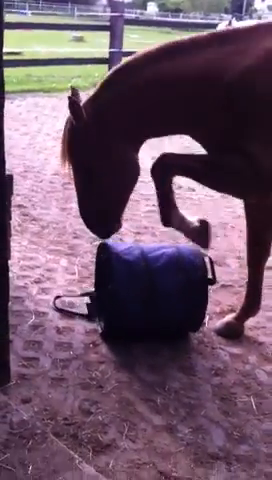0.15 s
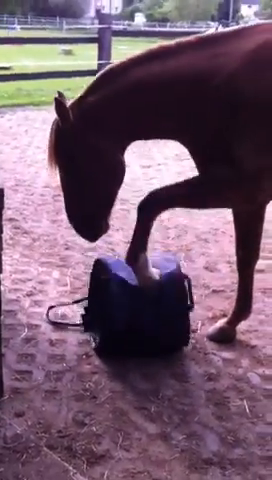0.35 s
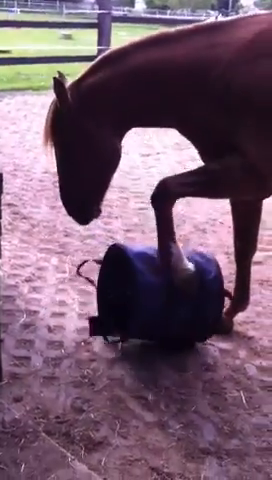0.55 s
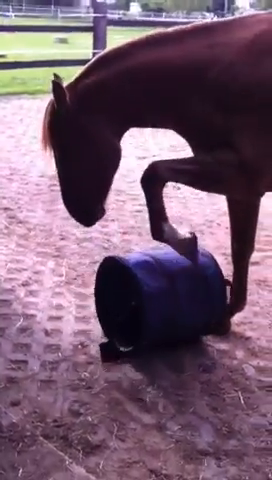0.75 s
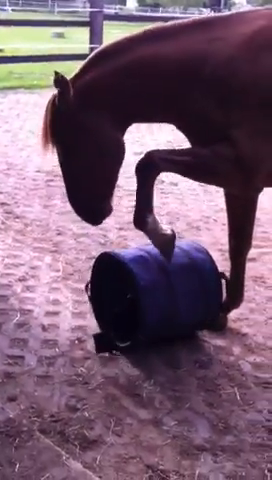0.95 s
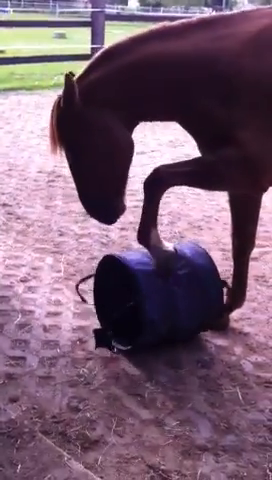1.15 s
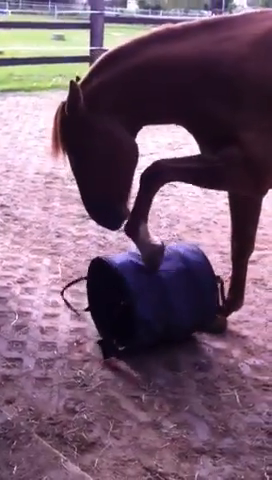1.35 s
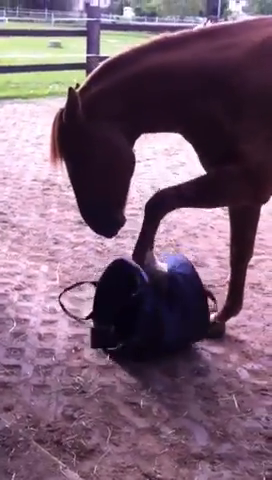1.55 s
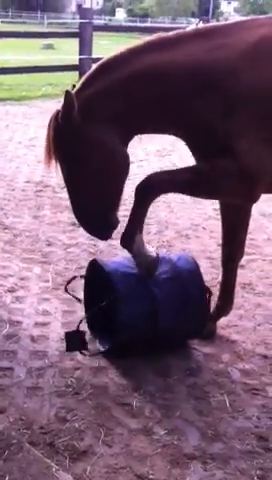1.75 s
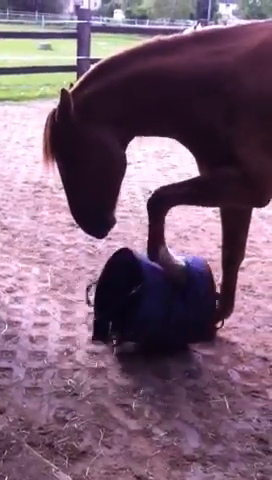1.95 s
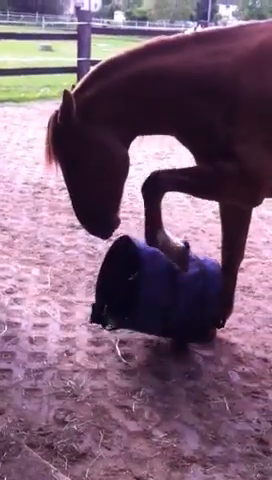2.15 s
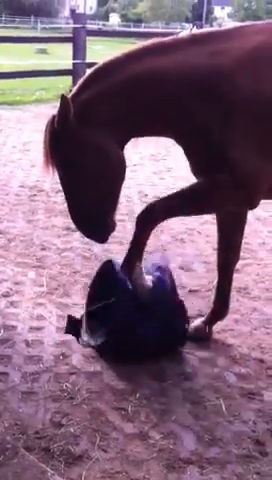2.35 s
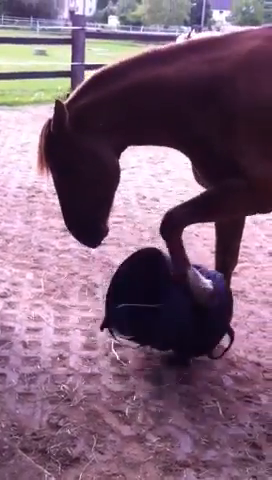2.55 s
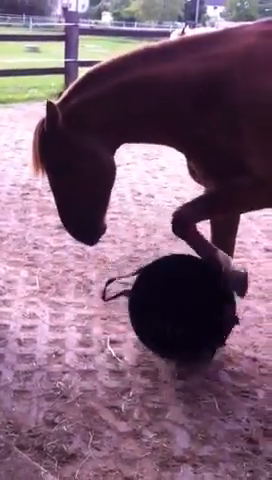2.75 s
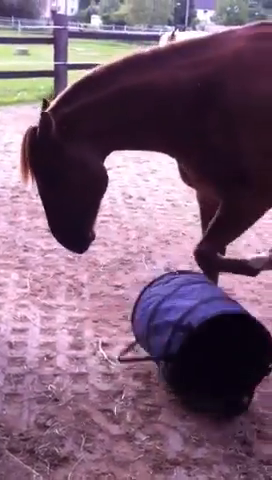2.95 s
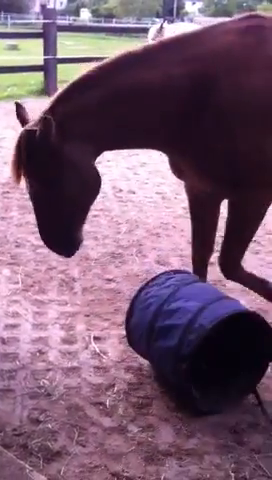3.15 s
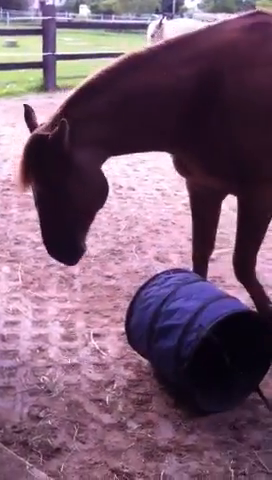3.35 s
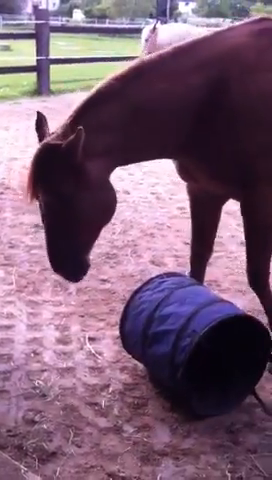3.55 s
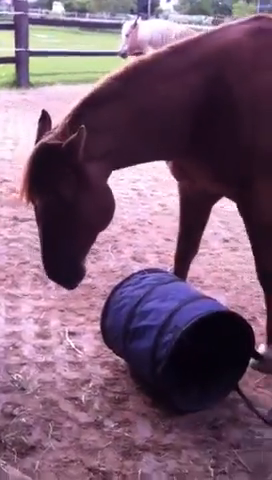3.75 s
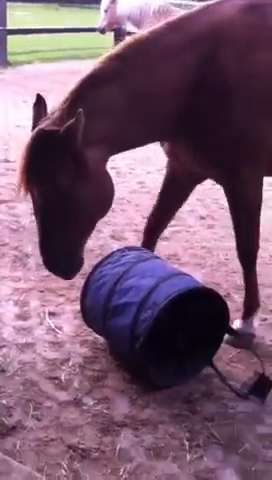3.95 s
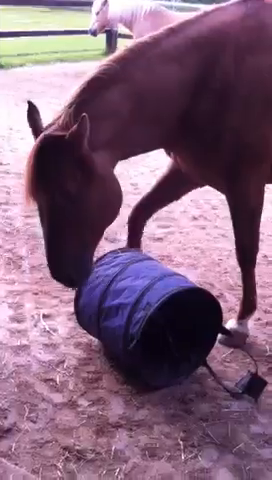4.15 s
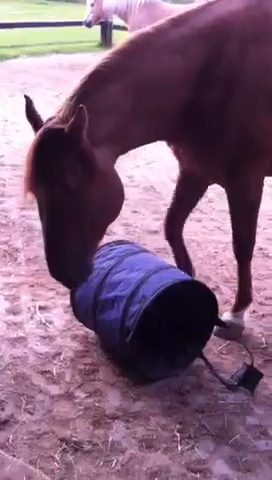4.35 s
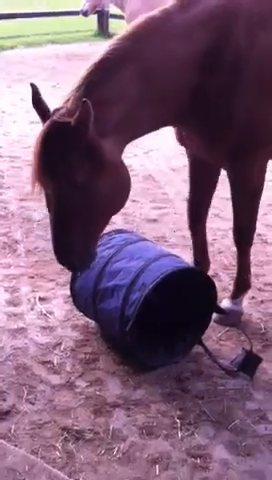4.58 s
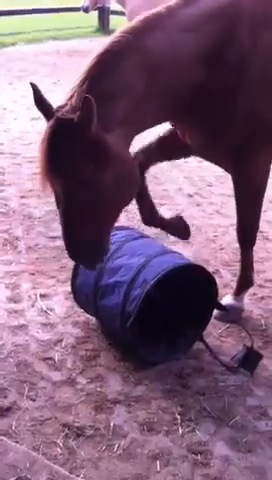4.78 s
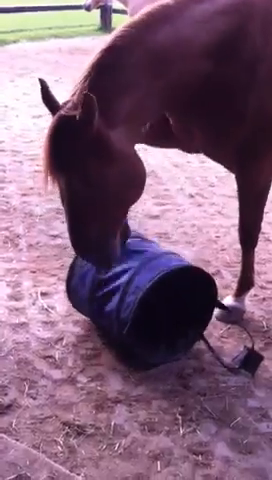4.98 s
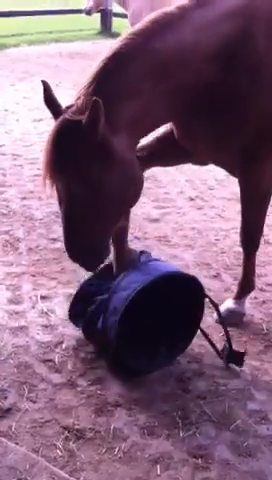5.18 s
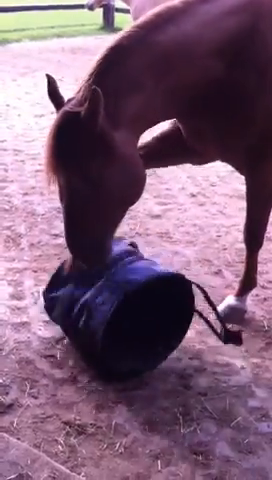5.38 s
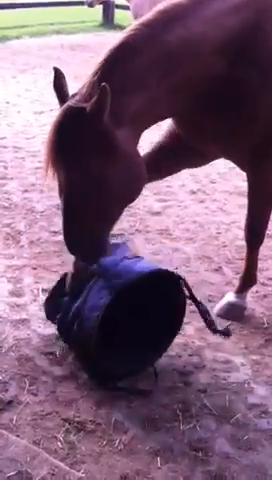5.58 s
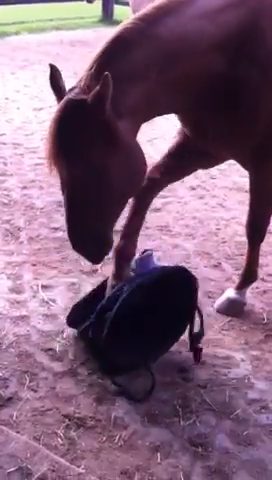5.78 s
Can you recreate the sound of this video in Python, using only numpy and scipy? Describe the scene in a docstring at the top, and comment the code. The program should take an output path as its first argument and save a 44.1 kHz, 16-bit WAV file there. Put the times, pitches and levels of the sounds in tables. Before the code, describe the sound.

Close view of a hoof working a hollow fabric bin: irregular nylon rustle, dull knocks, crisp snaps and short low thumps, with scraping over the weave. The activity peaks mid-way, stops for almost two seconds with only light brushing, sand crunch and thin distant chirps, then restarts abruptly. Mild covered-arena reverberation, distant wind and traffic murmur, little deep bass, no voice or music.

```python
"""Horse pawing a nylon bin

A horse paws a collapsible nylon bin lying on the sand of a covered riding arena.
Panels flap, creases buckle and snap, the hoof rasps over the weave; low thumps and hoop clacks stand out.
In a pause come steps in the sand and light brushing; a far bird chirps over the outdoor hush.
Cloth and sand are random clicks through spectral filters; thumps and chirps are gliding sines.
"""
import sys
import numpy as np
from scipy import signal
from scipy.io import wavfile
from scipy.ndimage import uniform_filter1d

SR = 44100
rng = np.random.default_rng(int(sys.argv[2]) if len(sys.argv) > 2 else 0)


def generate_wav(sig):
    """Save sig (samples, or channels by samples) to the path in sys.argv[1] as 16-bit PCM at SR."""
    pcm = np.round(np.clip(np.atleast_2d(sig).T, -1, 1) * 32767).astype(np.int16)
    wavfile.write(sys.argv[1], SR, pcm)


N = 256662

# Spectrum of buckling creases. Each row: frequency in Hz, relative density in dB per Hz.
CREASE_SPECTRUM = [(60, -29), (150, -11), (300, -4), (450, 0), (600, 3.5), (665, -4), (730, -0.5), (950, 1),
                   (1060, -8), (1450, -7), (2100, -14), (3200, -22.5), (7000, -37), (16000, -81)]
# Spectrum of crisp crackle. Each row: frequency in Hz, relative density in dB per Hz.
CRACK_SPECTRUM = [(100, -42), (500, 8.5), (1500, 5), (3000, -3), (6000, -5.5), (10000, -16), (16000, -17)]


def amp(db):
    """Decibels to gain."""
    return 10 ** (np.asarray(db) / 20)


def evened(x):
    """Scales to rms 1."""
    return x / np.sqrt(np.mean(x ** 2) + 1e-20)


def read(points, hz):
    """Interpolates a table of (Hz, value) on a log-frequency axis."""
    point_hz, value = np.transpose(points)
    return np.interp(np.log(hz + 1), np.log(point_hz), value)


def add(mix, start_s, sound):
    """Adds a sound into mix in place, cut at the end of mix."""
    part = mix[round(start_s * SR):][:len(sound)]
    part += sound[:len(part)]


def colour(x, spectrum, size=4096):
    """Minimum-phase filter of unit energy with the given spectrum."""
    hz = abs(np.fft.fftfreq(size, 1 / SR))
    log_gain = np.log(amp(read(spectrum, hz)))
    response = np.exp(np.conj(signal.hilbert(log_gain)))
    taps = np.fft.ifft(response).real[:size // 2]
    return signal.oaconvolve(x, taps / np.linalg.norm(taps))[:len(x)]


def clicks(per_s, spread_db, steady_s, size=N):
    """Random slips of uneven size whose power stays near 1 over steady_s."""
    size_db = spread_db * np.minimum(rng.exponential(1, size), 4)
    sizes = amp(size_db) * rng.choice([-1, 1], size)
    train = sizes * (rng.random(size) < per_s / SR)
    power = uniform_filter1d(train ** 2, max(int(steady_s * SR), 2))
    floor = np.mean(train ** 2) / 20 + 1e-12
    return train / np.sqrt(abs(power) + floor)


def burst(t60_s, rise_s, per_s, size=16384):
    """A shower of slips that swells fast and dies away."""
    t = np.arange(size) / SR
    slips = clicks(per_s, spread_db=2.1, steady_s=0.0065, size=size)
    return slips * (1 - np.exp(-t / rise_s)) * amp(-60 * t / t60_s)


def strengths(rows, shape):
    """Plays one shape per row (start s, length s, dB, dB), summing power; returns both gains over time."""
    first, second = np.zeros((2, N))
    for start_s, length_s, first_db, second_db in rows:
        power = shape(length_s) ** 2
        add(first, start_s, amp(first_db) ** 2 * power)
        add(second, start_s, amp(second_db) ** 2 * power)
    return np.sqrt(first), np.sqrt(second)


def arena(x, wet_db, delay_s=0.0061):
    """Ground, rails and roof return a dense tail whose treble dies sooner than its bass."""
    # Each row: frequency in Hz, t60 in seconds.
    decay = [(150, 0.66), (600, 0.58), (3000, 0.21), (8000, 0.26), (15000, 0.18)]
    echoes = rng.standard_normal(SR) * (rng.random(SR) < 3000 / SR)
    echoes = echoes * (np.arange(SR) > delay_s * SR)
    hz, t, z = signal.stft(echoes, SR, nperseg=256)
    fade = amp(-60 * t / read(decay, hz)[:, None])
    tail = signal.istft(z * fade, SR, nperseg=256)[1]
    reverb = signal.fftconvolve(x, tail / np.linalg.norm(tail))[:N]
    wet = amp(wet_db)
    return (x + wet * reverb) / np.hypot(1, wet)


def hush():
    """Distant outdoor murmur of wind and traffic: steady coloured noise."""
    # Each row: frequency in Hz, relative density in dB per Hz.
    murmur = [(18, -42), (30, -32), (48, -15.5), (134, -7), (194, -1.5), (252, -6), (319, -5.5), (449, -5),
              (526, -3.5), (702, -7.5), (760, -7), (1100, -12), (2410, -25.5), (14800, -35), (16000, -43)]
    return amp(-53.5) * evened(colour(rng.standard_normal(N), murmur))


def bird(waver=0.049):
    """A far bird's thin, falling chirps: a gliding sine with random waver and flutter."""
    # Each row: start in seconds, level in dB.
    chirp_rows = [(0.275, -63), (3.688, -60.5), (3.971, -62), (4.81, -64)]
    # The falling slur. Each row: time into the chirp in seconds, mean pitch in Hz, relative level in dB.
    slur = [(0, 4550, -9), (0.02, 4300, 7), (0.05, 3900, -3), (0.08, 3500, 5), (0.11, 2940, -16)]
    out = np.zeros(N)
    slur_s, slur_hz, slur_db = np.transpose(slur)
    t = np.arange(0, slur_s[-1], 1 / SR)
    for start_s, level_db in chirp_rows:
        noise = rng.standard_normal((2, len(t)))
        wobble, flutter = evened(uniform_filter1d(noise, SR // 150))
        pitch_hz = np.interp(t, slur_s, slur_hz) * (1 + waver * wobble)
        turns = np.cumsum(pitch_hz) / SR
        chirp = flutter * np.sin(2 * np.pi * turns) * signal.windows.tukey(len(t), 0.2)
        add(out, start_s, amp(level_db + np.interp(t, slur_s, slur_db)) * chirp)
    return out


def brush(length_s):
    """Strength of one soft arch of light contact."""
    return np.sin(np.pi * np.arange(0, length_s, 1 / SR) / length_s)


def footing():
    """The hoof lands with a dull crunch; fine and coarse sand grains spray and slide."""
    # Hoof landings. Each row: start in seconds, relative level in dB.
    footfalls = [(4.477, -24.5)]
    # Sand sprays. Each row: start in seconds, relative fine and coarse levels in dB, t60 in seconds.
    scuffs = [(0.9181, -51, -32.5, 0.037), (3.461, -36.5, -39.5, 0.12), (3.582, -41, -65, 0.21),
              (3.6443, -40, -65, 0.21), (3.8097, -44, -68, 0.21), (4.0911, -40, -54, 0.25),
              (4.3048, -28, -57, 0.1), (4.4842, -28.5, -41.5, 0.29), (4.5076, -19, -45, 0.12),
              (4.763, -33.5, -49, 0.18), (4.777, -33.5, -45.5, 0.15), (4.7974, -39, -55, 0.11)]
    # Hoof and muzzle on sand and cloth. Each row: start and length in seconds,
    # relative fine hiss and coarse scraping levels in dB.
    brushes = [(0.0, .22, -63, -54.5), (3.3, .2, -59.5, -52), (3.83, 0.23, -48, -53.5),
               (4.05, 0.16, -57, -56.5), (4.18, 0.21, -53, -55.5)]
    # Spectra. Each row: frequency in Hz, relative density in dB per Hz.
    ground = [(40, -44), (120, -12), (190, 3), (330, 1), (700, -0.5), (1200, -1.5), (2000, -39),
              (5000, -34), (16000, -34)]
    fine_sand = [(500, -7), (2800, -3.5), (5000, -0.5), (10000, 1), (13000, 0.5), (16000, -8)]
    coarse_sand = [(60, -25), (200, 6), (700, 7.5), (1500, 3.5), (2800, -2.5), (4500, -7.5), (7000, -7.5),
                   (16000, -27)]
    tread = np.zeros(N)
    hiss, scrape = strengths(brushes, brush)
    fine = amp(2.0) * clicks(per_s=3500, spread_db=1.5, steady_s=0.051) * hiss
    coarse = amp(1.0) * clicks(per_s=1000, spread_db=1.0, steady_s=0.13) * scrape
    for start_s, db in footfalls:
        add(tread, start_s, amp(db) * burst(t60_s=0.18, rise_s=0.0006, per_s=2500))
    for start_s, fine_db, coarse_db, t60_s in scuffs:
        spray = burst(t60_s, rise_s=0.0022, per_s=4500)
        add(fine, start_s, amp(fine_db - 9.5) * spray)
        add(coarse, start_s, amp(coarse_db - 0.5) * spray)
    sand = colour(fine, fine_sand) + colour(coarse, coarse_sand)
    return amp(-2.5) * colour(tread, ground) + sand


def clacks():
    """Hard horn on a sheathed steel hoop: one sharp click and a very short chatter."""
    # Each row: start in seconds, relative level in dB.
    clack_rows = [(0.457, -16), (2.807, -15.5)]
    # Each row: frequency in Hz, relative density in dB per Hz.
    hoop = [(150, -23), (600, -12), (1100, 11), (2000, 3), (3200, 7), (5000, -2), (9000, -8.5),
            (16000, -41)]
    out = np.zeros(N)
    for start_s, db in clack_rows:
        chatter = burst(t60_s=0.057, rise_s=0.00023, per_s=3500)
        chatter[0] += amp(13.0)
        add(out, start_s, amp(db) * chatter)
    return amp(-8.5) * colour(out, hoop)


def snaps(t60_s=0.055):
    """A taut crease lets go with a click and sets off its neighbours: a dull knock with a crisp edge."""
    # Each row: start in seconds, relative levels of knock and crisp edge in dB.
    snap_rows = [(0.407, -14, -37), (0.517, -32, -28), (0.655, -16.5, -41), (1.132, -26.5, -33.5),
                 (1.142, -17, -45), (1.182, -20.5, -47), (1.306, -17.5, -35), (1.401, -23.5, -52),
                 (1.451, -26, -31.5), (1.492, -26, -38), (1.608, -25, -23), (1.647, -14, -32),
                 (1.675, -29, -23), (1.742, -7.5, -24.5), (1.891, -20, -36), (2.007, -22, -43),
                 (2.327, -16.5, -42), (2.432, -20, -32), (2.451, -7, -25), (2.472, -9, -18.5),
                 (2.483, -16, -25), (2.925, -12, -33), (3.043, -17, -26.5), (3.061, -32, -21),
                 (3.25, -23.5, -34), (4.307, -52, -48), (5.066, -42, -34), (5.18, -33, -30),
                 (5.257, -18, -35), (5.468, -33, -34), (5.499, -37, -33.5)]
    knock, edge = np.zeros((2, N))
    for start_s, knock_db, edge_db in snap_rows:
        shower = burst(t60_s, rise_s=0.00041, per_s=3500)
        shower[0] += amp(10.5)
        add(knock, start_s, shower * amp(knock_db))
        add(edge, start_s, shower * amp(edge_db))
    return amp(-7.0) * colour(knock, CREASE_SPECTRUM) + amp(2.0) * colour(edge, CRACK_SPECTRUM)


def thumps(swell_s=0.0081, sag=0.39):
    """A whole panel gives way: a few heavy low cycles that sink in pitch as the cloth slackens."""
    # Each row: start in seconds, relative level in dB, middle of the pitch fall in Hz.
    thump_rows = [(0.11, -36, 220), (0.368, -17, 210), (0.472, -14, 227), (0.542, -14.5, 239.5),
                  (0.696, -25.5, 192), (0.803, -27, 250), (1.14, -23.5, 187), (1.312, -24.5, 225),
                  (1.738, -9, 216), (2.003, -22, 180), (2.196, -21.5, 260), (2.334, -24.5, 170),
                  (2.438, -6.5, 194.5), (2.641, -14, 216), (2.924, -13.5, 220), (2.946, -19, 244),
                  (3.099, -12, 173), (3.254, -23, 188), (3.404, -34, 205), (3.48, -40.5, 198),
                  (5.078, -19, 197), (5.289, -22.5, 202)]
    out = np.zeros(N)
    t = np.arange(SR // 8) / SR
    shape = (t / swell_s) ** 2 * np.exp(2 * (1 - t / swell_s))
    glide = 1 + sag * (np.exp(-t / swell_s / 2) - 0.5)
    for start_s, db, hz in thump_rows:
        turns = np.cumsum(hz * glide) / SR
        add(out, start_s, amp(db) * shape * np.sin(2 * np.pi * turns))
    return amp(-1.5) * out


def folds(x, depth_db, width_hz, hold_s):
    """The cloth keeps changing shape: smoothed random gains over time and frequency."""
    hz, t, z = signal.stft(x, SR, nperseg=512, noverlap=384)
    field = rng.standard_normal(z.shape)
    bins = max(round(width_hz / hz[1]), 1)
    frames = max(round(hold_s / t[1]), 1)
    for _ in range(2):
        field = uniform_filter1d(field, bins, 0)
        field = uniform_filter1d(field, frames, 1)
    gain = evened(amp(depth_db * np.clip(evened(field), -2, 2)))
    return signal.istft(z * gain, SR, nperseg=512, noverlap=384)[1][:N]


def slide(length_s):
    """Strength of one slide: it swells as the hoof gathers speed, then runs out."""
    swell_power, run_out_db_per_s = 0.45, 197
    t = np.arange(SR // 2) / SR
    swell = np.minimum(t / length_s, 1) ** swell_power
    return swell * amp(-run_out_db_per_s * np.maximum(t - length_s, 0))


def rubbing(force):
    """The hoof skips over the threads of the weave: a gritty rasp and a treble fizz."""
    # Each row: start and time gathering speed in seconds, relative rasp and fizz levels in dB.
    slide_rows = [(0.355, .055, -32.5, -41), (0.455, 0.0055, -31.5, -32.5), (0.51, 0.027, -32, -33.5),
                  (0.61, 0.05, -38, -42), (0.68, 0.11, -40, -41.5), (0.91, 0.0069, -44, -50),
                  (0.98, 0.062, -60, -55), (1.178, 0.012, -36.5, -58), (1.2, 0.075, -44, -40.5),
                  (1.485, 0.0083, -36.5, -48), (1.545, 0.079, -37, -36), (1.67, 0.061, -33, -35.5),
                  (1.82, 0.021, -42, -40.5), (1.91, .06, -34.5, -36), (2.005, 0.0097, -31, -59),
                  (2.05, 0.028, -36, -34), (2.16, 0.016, -46.5, -45.5), (2.322, 0.029, -49, -47),
                  (2.418, 0.06, -29, -39), (2.50, 0.079, -29.5, -29.5), (2.71, 0.097, -39, -37),
                  (2.825, 0.03, -36, -42), (3.041, 0.0047, -36.5, -36.5), (3.155, 0.015, -45.5, -46.5),
                  (3.268, 0.0073, -39.5, -45), (5.066, 0.021, -29, -32.5), (5.14, 0.052, -32, -41),
                  (5.2, 0.015, -37.5, -37.5), (5.29, 0.063, -45, -46.5), (5.357, 0.024, -37.5, -37),
                  (5.475, 0.038, -37, -38), (5.56, 0.036, -43, -46), (5.68, 0.063, -40.5, -36.5),
                  (5.77, 0.057, -29.5, -30)]
    # Spectra. Each row: frequency in Hz, relative density in dB per Hz.
    weave = [(100, -57), (400, 10), (1200, 6.5), (2500, 2.5), (4000, 0.5), (6500, -3.5), (9000, -10),
             (12500, -18.5), (16000, -33.5)]
    fizz_spectrum = [(300, -31), (3000, -3.5), (6000, -0.5), (8500, -1), (11000, -4), (14000, -6),
                     (16000, -13.5)]
    rasp, fizz = strengths(slide_rows, slide)
    # every push also drags the hoof a little
    rasp = np.hypot(rasp, amp(-16.5) * force)
    fizz = np.hypot(fizz, amp(-18) * force)
    skips = clicks(per_s=7000, spread_db=1.5, steady_s=0.021)
    swish = amp(3.5) * colour(skips * rasp, weave) + amp(-0.54) * colour(skips * fizz, fizz_spectrum)
    return folds(swish, depth_db=2.5, width_hz=350, hold_s=0.02)


def crumpling(force):
    """Creases buckle in dull pops; a sparser few crackle up into the treble."""
    pops = clicks(per_s=1000, spread_db=2.5, steady_s=0.022) * force
    crackle = clicks(per_s=140, spread_db=2.5, steady_s=0.1) * force
    body = folds(colour(pops, CREASE_SPECTRUM), depth_db=3.0, width_hz=170, hold_s=0.026)
    dull = amp(-12) * colour(crackle, CREASE_SPECTRUM)
    crisp = amp(-19.5) * colour(crackle, CRACK_SPECTRUM)
    return amp(-3.64) * body + dull + crisp


def hollow(x, direct_db):
    """The drum of the bin rings at its modes beside the direct sound of the panel."""
    # Air and hoops of the bin. Each row: frequency in Hz, width in Hz, relative level in dB.
    modes = [(148, 14, -11.5), (179, 12, -1), (231.2, 5.4, -0.5), (263, 79, -9), (334.7, 22, 0.5),
             (407, 47, -24)]
    # Each row: frequency in Hz, relative density in dB per Hz.
    panel = [(25, -33), (70, -39), (105, -35.5), (140, -4), (220, 9.5), (300, -8.5), (420, -11.5),
             (700, -9), (2000, -73)]
    t = np.arange(SR // 4) / SR
    ring = np.zeros(len(t))
    for hz, width_hz, db in modes:
        ring += amp(db) * width_hz * np.exp(-np.pi * width_hz * t) * np.cos(2 * np.pi * hz * t)
    ring /= np.linalg.norm(ring)
    band = signal.butter(2, [125, 450], "bandpass", fs=SR, output="sos")
    ring = signal.sosfilt(band, ring)
    ringing = signal.oaconvolve(x, ring)[:len(x)]
    direct = amp(direct_db)
    return (ringing + direct * colour(x, panel)) / np.hypot(1, direct)


def flapping(force):
    """Slack panels flip in and out and stir the air in the bin."""
    flips = clicks(per_s=330, spread_db=3.0, steady_s=0.03) * force
    return amp(-1.5) * hollow(flips, direct_db=1.0)


def press(hold_s):
    """Force of the hoof in one push: a quick attack, a hold and a release."""
    attack_s, release_db_per_s = 0.0057, 333
    t = np.arange(SR) / SR
    return np.minimum(t / attack_s, 1) * amp(-release_db_per_s * np.maximum(t - hold_s, 0))


def push(hold_s):
    """Motion of the cloth in one push: it follows the hoof, then the springy hoops settle slowly."""
    settle_db, settle_db_per_s = -6.5, 88
    after_s = np.arange(SR) / SR - hold_s
    settling = (after_s > 0) * amp(settle_db - settle_db_per_s * after_s)
    return np.maximum(press(hold_s), settling)


def scene():
    """Bin and hooves in the arena, bird and hush beyond it."""
    # Hoof presses the bin in. Each row: start and hold in seconds,
    # relative panel flapping and crease buckling levels in dB.
    pushes = [(0.355, 0.058, -27.5, -26.5), (0.445, 0.13, -27.5, -26), (0.68, 0.14, -34, -34.5),
              (1.0, .05, -43.5, -48), (1.135, 0.083, -32, -30.5), (1.305, 0.34, -33.5, -34.5),
              (1.605, 0.067, -29.5, -25), (1.73, 0.079, -23.5, -23.5), (1.89, 0.14, -40, -32.5),
              (1.995, 0.08, -28.5, -32.5), (2.195, 0.047, -29.5, -33.5), (2.325, 0.027, -32, -37),
              (2.438, 0.073, -21, -19.5), (2.52, 0.16, -30, -25.5), (2.78, 0.18, -37, -34),
              (2.92, 0.019, -27.5, -32.5), (3.04, 0.069, -24, -26), (3.25, 0.071, -35, -41.5),
              (5.066, 0.028, -24.5, -34), (5.145, 0.03, -25.5, -23.5), (5.24, 0.052, -27, -25.5),
              (5.365, 0.017, -49, -34.5), (5.495, 0.13, -32, -31), (5.67, 0.097, -32, -32.5),
              (5.785, .04, -27.5, -28.5)]
    flap, buckle = strengths(pushes, push)
    _, drag = strengths(pushes, press)
    far = arena(bird(), wet_db=-3)
    sand = arena(footing(), wet_db=-14.5)
    cloth = clacks() + snaps() + thumps() + rubbing(drag) + crumpling(buckle) + flapping(flap)
    return (hush() + far + sand + arena(cloth, wet_db=-12))[None]


def record(dry):
    """The small microphone shelves down the deep bass; then the band limit."""
    highpass = signal.butter(4, 112, "highpass", fs=SR, output="sos")
    lowpass = signal.butter(2, 70, fs=SR, output="sos")
    sound = signal.sosfilt(highpass, dry) + amp(-2.5) * signal.sosfilt(lowpass, dry)
    band_limit = signal.firwin(511, 16020, window=("kaiser", 9), fs=SR)  # cutoff in Hz
    return signal.oaconvolve(sound, band_limit[None], "same")


dry = scene()
out = record(dry)
generate_wav(out)
```